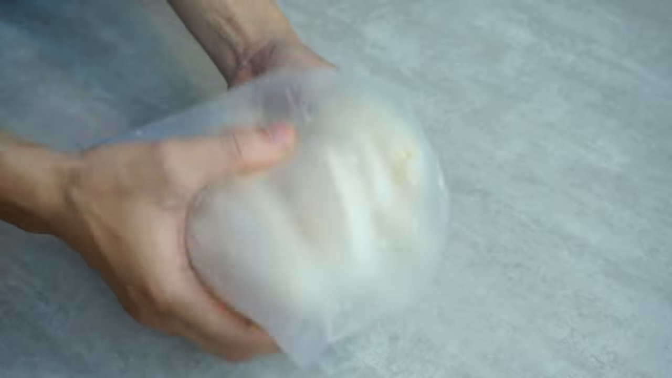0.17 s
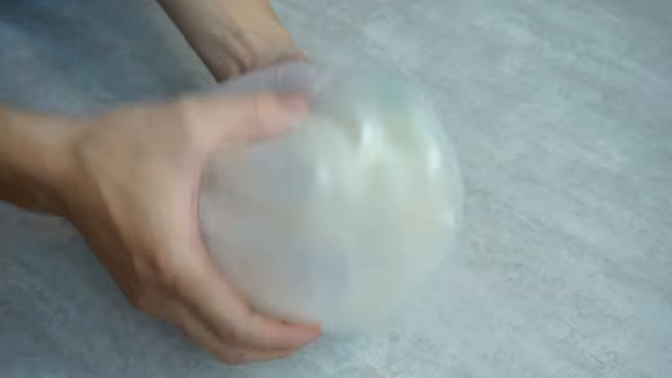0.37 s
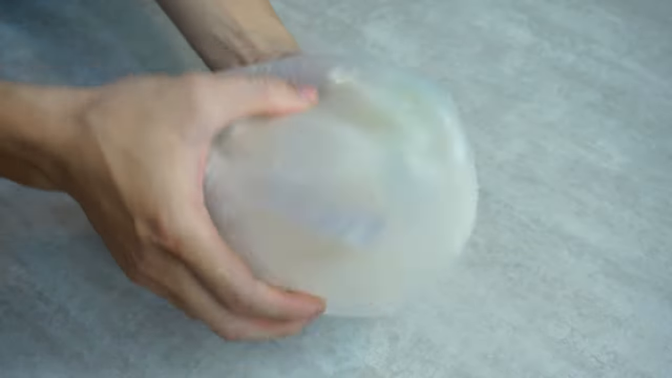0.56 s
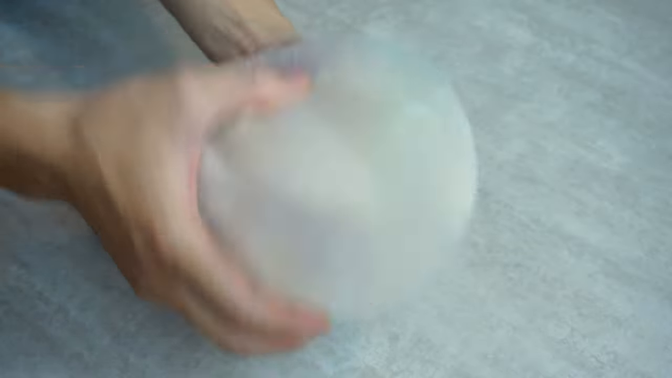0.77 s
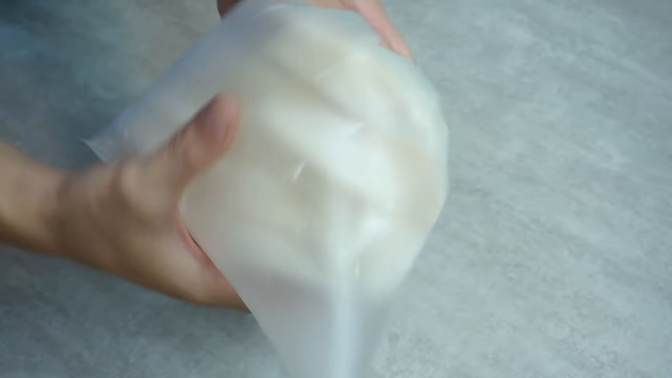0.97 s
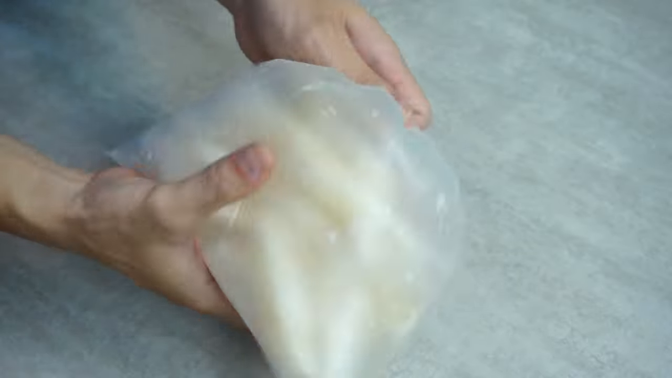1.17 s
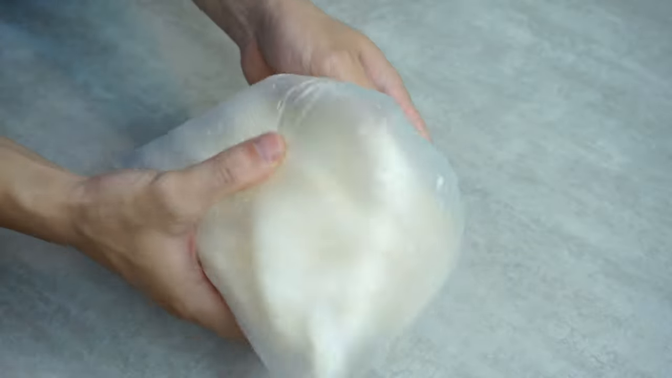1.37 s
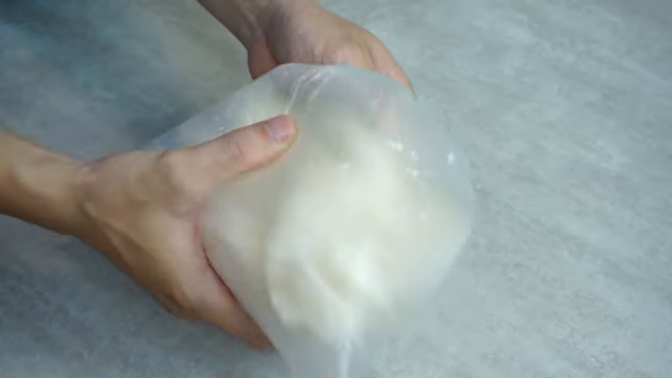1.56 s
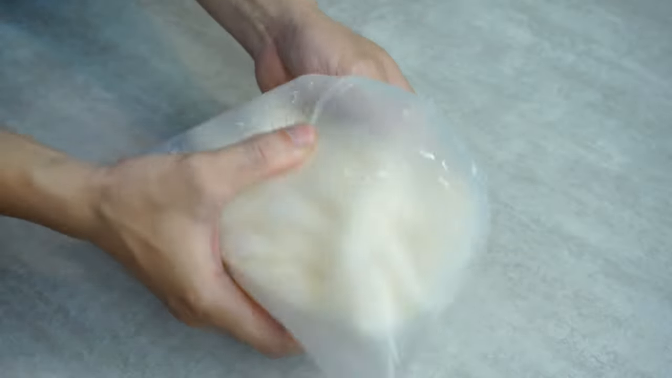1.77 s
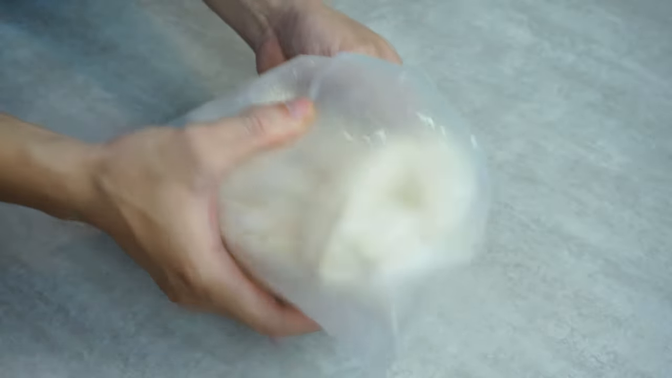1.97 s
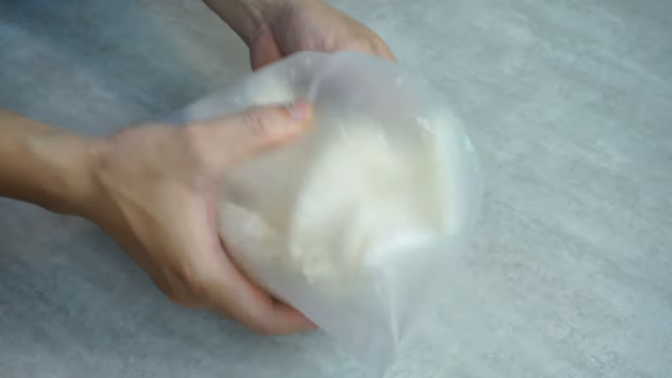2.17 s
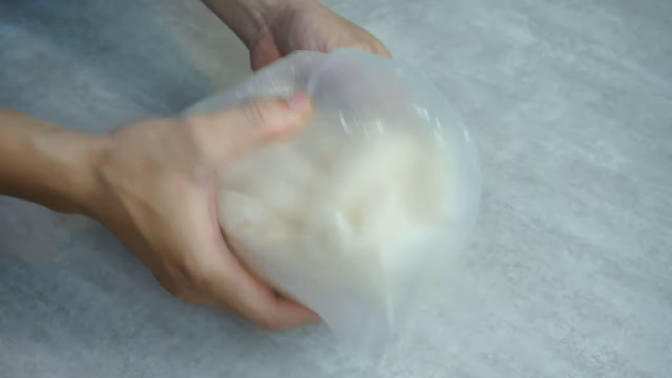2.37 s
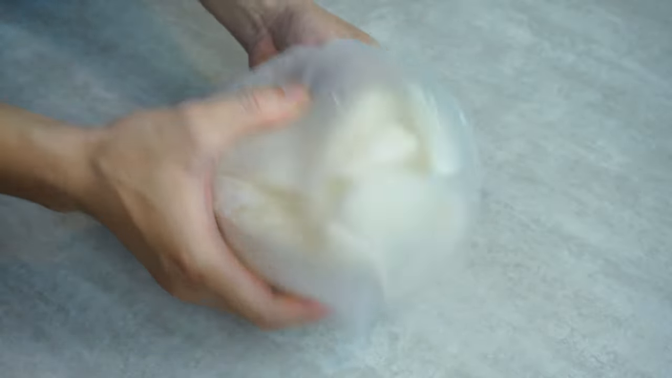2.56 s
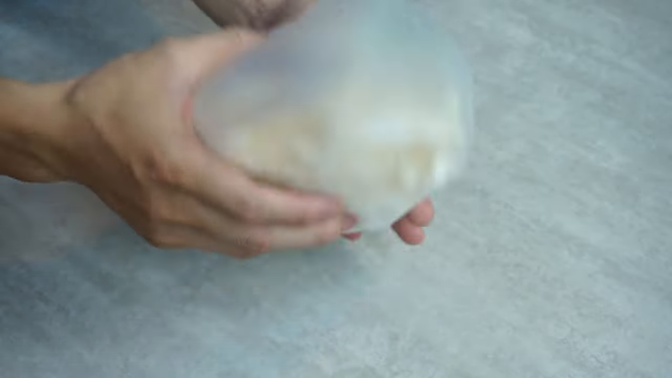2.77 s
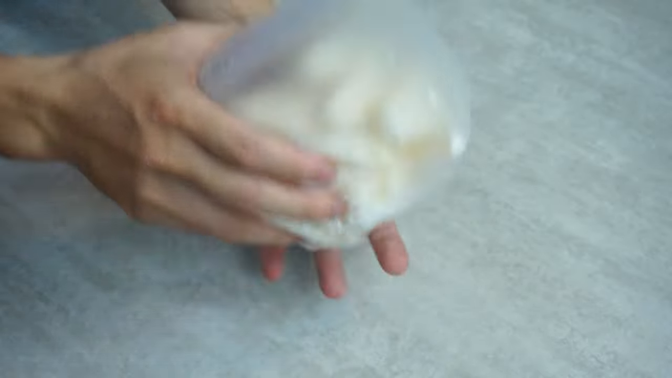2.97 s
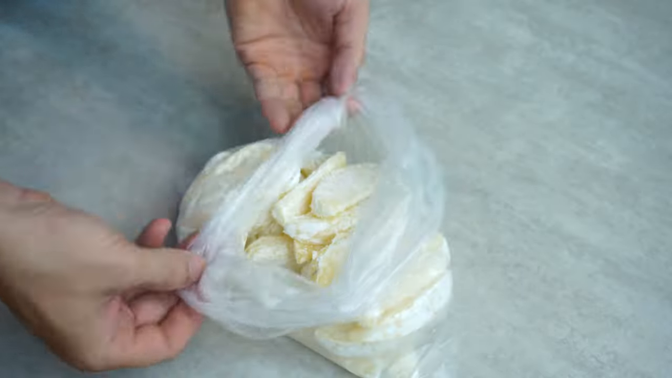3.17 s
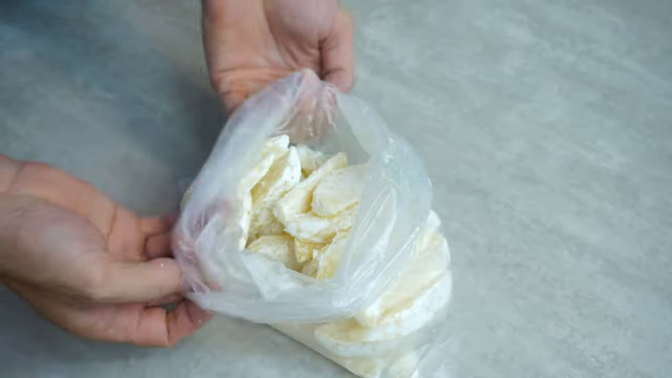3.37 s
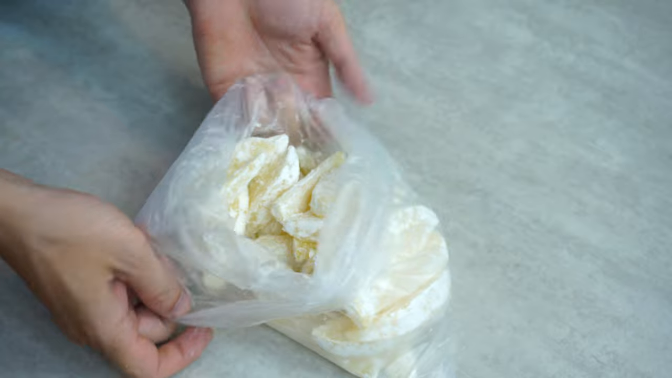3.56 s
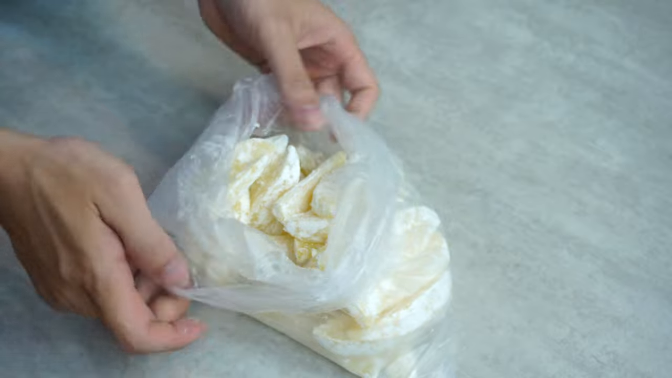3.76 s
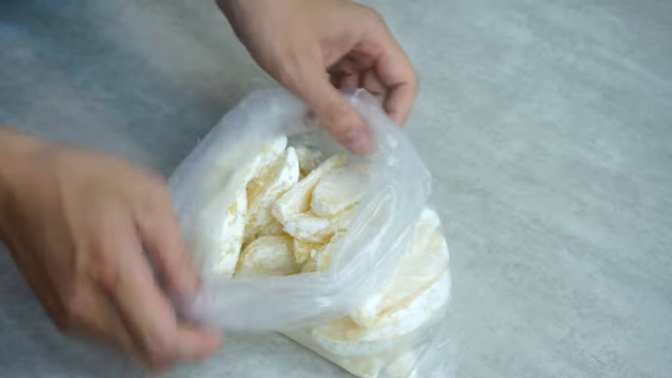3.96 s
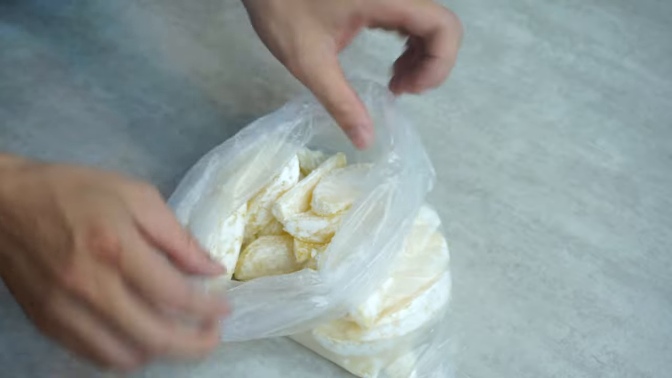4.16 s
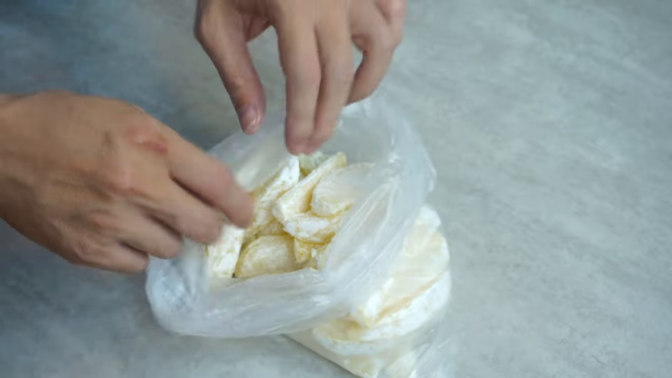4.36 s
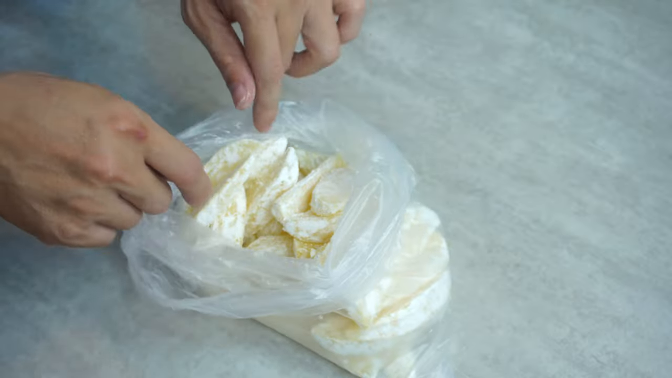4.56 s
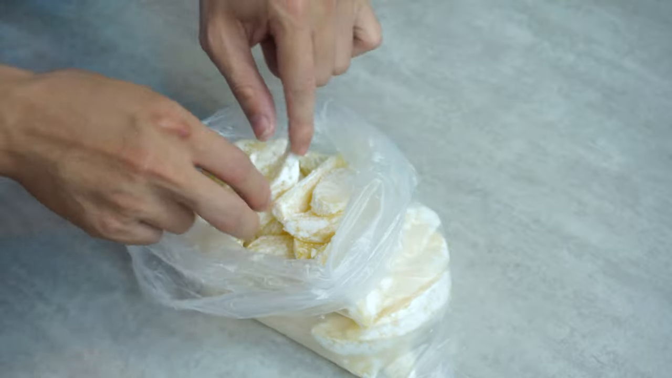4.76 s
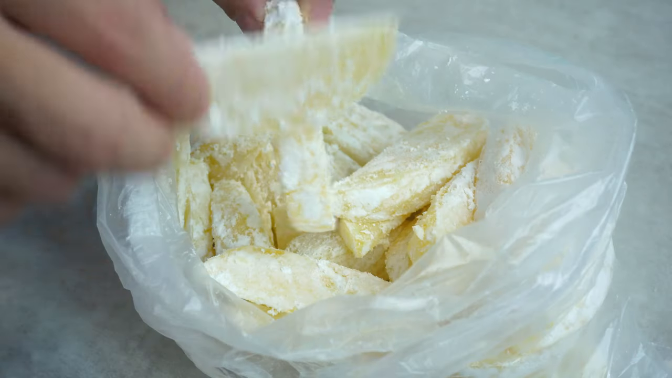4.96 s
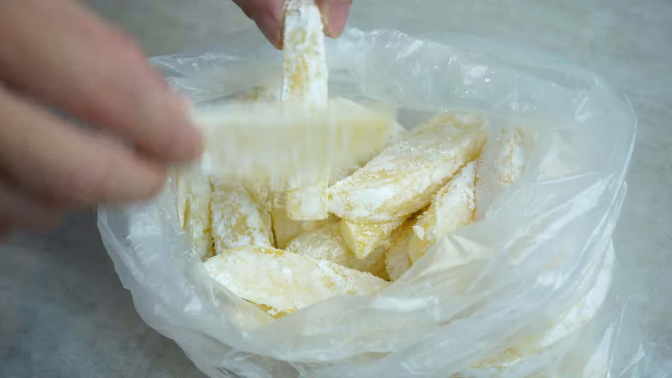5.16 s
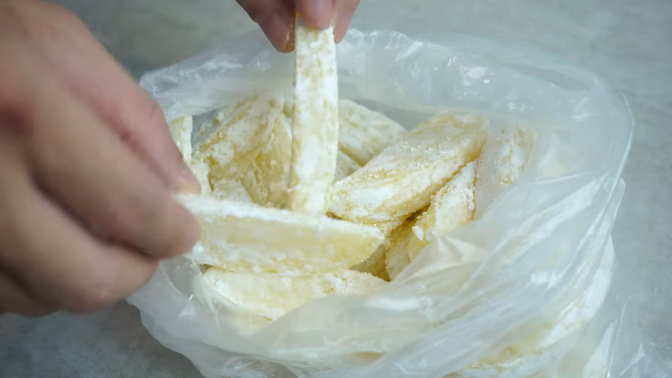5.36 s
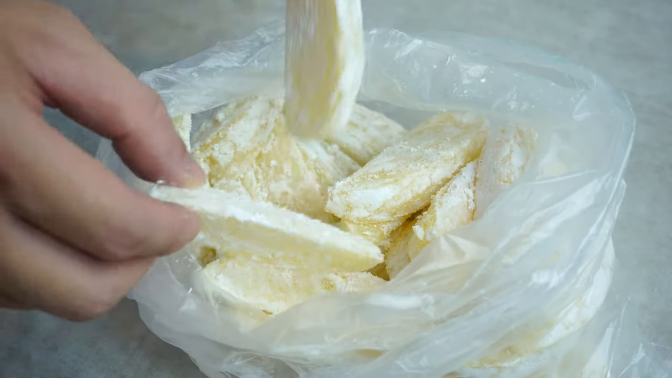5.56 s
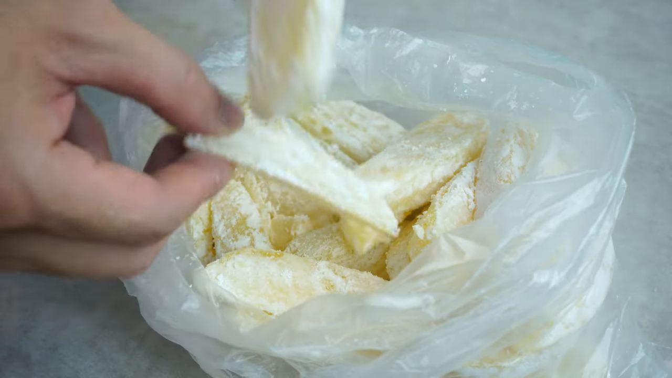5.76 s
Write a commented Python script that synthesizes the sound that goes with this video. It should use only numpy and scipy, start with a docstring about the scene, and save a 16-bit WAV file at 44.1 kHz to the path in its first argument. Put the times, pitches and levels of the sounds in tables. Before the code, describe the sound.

Potato wedges thud around in a shaken plastic bag, then the bag crinkles open and one wedge taps lightly against another.

```python
"""Two hands shake potato wedges in a thin plastic bag: the wedges collide with dull thuds, slap and
crease the film, and set the enclosed air humming. At 3.06 s a second scene starts abruptly: over a faint
kitchen rumble the hands pull the bag open, and its folds buckle with crinkles and sharp snaps.
From 5 s, heard closer, fingers rub the dry wedges and lift one out; it taps another near 5.4 s,
and the film crinkles softly to the end."""
import sys
import numpy as np
from scipy import signal
from scipy.fft import rfft, irfft, next_fast_len
from scipy.io import wavfile
from scipy.ndimage import uniform_filter1d, map_coordinates

SR = 44100
rng = np.random.default_rng(int(sys.argv[2]) if len(sys.argv) > 2 else 0)


def bounce(signal):
    """Save signal as a 16-bit WAV file at the path given by the first command-line argument."""
    frames = np.transpose(np.atleast_2d(signal))
    limited = np.clip(frames, -1, 1)
    pcm = np.round(limited * 32767).astype(np.int16)
    wavfile.write(sys.argv[1], SR, pcm)


N = 256662
TIME = np.arange(N) / SR
OPEN_S, LIFT_S = 3.058, 4.99  # shaking gives way to opening, opening to lifting
TOP_HZ = 16000


def amp(db):
    """Decibels to amplitude ratio."""
    return 10 ** (np.asarray(db) / 20)


def unit_rms(x):
    """Normalisation to unit mean power."""
    return x / np.sqrt(np.mean(x ** 2) + 1e-20)


def at_frequency(points, hz):
    """Interpolation of (frequency_hz, value) points on a logarithmic axis."""
    knots_hz, values = np.transpose(points)
    return np.interp(np.log(hz + 1), np.log(knots_hz + 1), values)


def curves(rows):
    """Linear interpolation in time: one curve for each column after the first."""
    times, *columns = np.transpose(rows)
    return [np.interp(TIME, times, column) for column in columns]


def wobble(rate_hz, size=N):
    """Slow random modulation: a spline through Gaussian knots."""
    knots = rng.standard_normal(int(size * rate_hz / SR) + 4)
    return map_coordinates(knots, [np.arange(size) * rate_hz / SR])


def filtered(x, response):
    """Linear filtering: the spectrum times a frequency response."""
    size = next_fast_len(N + 8192)
    return irfft(rfft(x, size) * response(np.fft.rfftfreq(size, 1 / SR)), size)[..., :N]


def pulses(peak_s, gain, hz, rise_s, phase, size):
    """Superposition of damped sine bursts, each with its envelope peaking at peak_s."""
    t = np.arange(size) / SR
    age = t / rise_s[:, None]
    carrier = np.sin(2 * np.pi * (hz[:, None] * t + phase[:, None]))
    bursts = gain[:, None] * age * np.exp(1 - age) * carrier
    index = np.round(np.abs(peak_s - rise_s) * SR).astype(int)[:, None] + np.arange(size)
    return np.bincount(index.ravel(), bursts.ravel(), N + size)[:N]


# Stereo width: frequency_hz, side_minus_mid_db
STEREO_WIDTH = [(60, -28.5), (110, -32), (200, -19), (380, -13), (700, -11.5), (1290, -8), (2380, -9),
                (4400, -4.5), (8120, -4), (15000, -4)]
def spread(pair, spectrum, inside):
    """Mid-side stereo: coloured sound whose channels are more coherent in the bass than the treble."""
    def response(hz):
        return amp(at_frequency(spectrum, hz) + [0 * hz, at_frequency(STEREO_WIDTH, hz)])
    mid, side = filtered(pair, response)
    return np.array([mid + side, mid - side]) / np.sqrt(np.mean(mid[inside] ** 2))


def grains(span, spectrum, top_hz, rise_s, spread_db, clump_db, clump_hz, hiss, count, size):
    """Shot noise: tiny random bursts over a hiss, amplitude-modulated into clumps."""
    when, pitch, mid_phase, side_phase, slowness = rng.random((count, 5)).T
    times = span[0] + when * (span[1] - span[0])
    gain = amp(spread_db * np.clip(rng.standard_normal(count), -3, 2.5))
    rises = rise_s * 4 ** slowness
    inside = slice(round(span[0] * SR), round(span[1] * SR))
    pair = np.zeros((2, N))
    for channel, phase in enumerate((mid_phase, side_phase)):
        bursts = pulses(times, gain, pitch * top_hz, rises, phase, size)[inside]
        pair[channel, inside] = unit_rms(bursts) + hiss * rng.standard_normal(len(bursts))
    return spread(pair * amp(clump_db * wobble(clump_hz)), spectrum, inside)


def patchy(x, depth_db, size):
    """Spectral fluctuation: small parts ring and fall silent, as narrow, brief patches of gain."""
    spectra = signal.stft(x, nperseg=size)[2]
    field = uniform_filter1d(rng.standard_normal(spectra.shape[1:]), size=2, axis=0)
    field = uniform_filter1d(field, size=6, axis=1)
    return signal.istft(spectra * amp(depth_db * unit_rms(field)), nperseg=size)[1][:, :N]


# Kitchen noise and hands shifting over the counter: frequency_hz, density_db
ROOM_SPECTRUM = [(50, -44), (80, -10), (105, -6.5), (130, -8), (160, -5), (250, -5.5), (400, -11),
                 (900, -18), (3000, -23.5), (9000, -32), (13000, -40), (15800, -54.5)]
HANDLING_SPECTRUM = [(60, -29), (100, 2), (200, 2.5), (350, -7), (480, -15), (700, -40), (1200, -120)]
# Their envelopes: time_s, level_db
ROOM_LEVELS = [(3.06, -51), (3.13, -67), (3.7, -64), (4.1, -59), (4.3, -64.5), (4.6, -59), (4.82, -65),
               (5.0, -71.5), (5.15, -72), (5.3, -74), (5.4, -67.5), (5.82, -68)]
HANDLING_LEVELS = [(5.3, -95), (5.35, -72), (5.395, -65), (5.46, -71), (5.53, -70), (5.57, -74),
                   (5.63, -64), (5.68, -68), (5.74, -76), (5.79, -64), (5.82, -71)]
# Swells of the room's lowest mode: peak_s, level_db
MODE_SWELLS = [(3.76, -77.5), (3.93, -70), (4.13, -68), (4.58, -76), (4.68, -66), (4.76, -70), (4.84, -63),
               (5.16, -66), (5.4, -62), (5.53, -61), (5.68, -66), (5.8, -70)]
def kitchen_rumble(mode_hz=53, wander=.08, floor_db=-79.5, swell_s=.05):
    """A standing wave, the room's lowest mode, swells and fades amid ambient and handling noise."""
    handling = spread(rng.standard_normal((2, N)), HANDLING_SPECTRUM, slice(N))
    room = spread(rng.standard_normal((2, N)), ROOM_SPECTRUM, slice(N))
    hz = mode_hz * (1 + wander * wobble(25))
    mode = np.sqrt(2) * np.sin(2 * np.pi * np.cumsum(hz) / SR)
    swells = sum(amp(db) * np.exp(-((TIME - peak_s) / swell_s) ** 2) for peak_s, db in MODE_SWELLS)
    handling *= amp(curves(HANDLING_LEVELS)[0] + 2.7 * wobble(35))
    room *= amp(curves(ROOM_LEVELS)[0] + 1.56 * wobble(3.03))
    return (amp(floor_db) + swells) * mode + handling + room


# Reverberation time of the kitchen: frequency_hz, t60_s
ROOM_DECAY = [(100, .3), (1000, .25), (5000, 0.13), (15000, 0.086)]
def reverberation(x, level_db=-10):
    """Convolution with a diffuse tail that decays exponentially, fastest in the treble."""
    hz, t, spectra = signal.stft(rng.standard_normal((2, SR // 2)), SR, nperseg=256)
    decay = amp(-60 * t / at_frequency(ROOM_DECAY, hz)[:, None])
    tail = signal.istft(spectra * decay, SR, nperseg=256)[1]
    delayed = np.pad(x, ((0, 0), (200, 0)))
    return amp(level_db) * signal.fftconvolve(delayed, tail / np.linalg.norm(tail[0]), axes=1)[:, :N]


# Dry wedges rubbing: peak_s, level_db, pitch_hz, half_width_s
WEDGE_RUBS = [(4.789, -58, 424, 0.028), (4.795, -61, 1000, .012), (5.347, -67.5, 2050, .01),
              (5.373, -58, 2500, .012), (5.396, -49, 2500, .015), (5.396, -46, 5400, .012),
              (5.399, -49, 6200, .008), (5.42, -59, 2600, .006), (5.43, -56, 5500, .02),
              (5.478, -64, 2250, .015), (5.522, -66, 2150, .018), (5.617, -60, 2900, .005),
              (5.7, -68, 2300, .02), (5.73, -58, 2200, .005), (5.753, -56, 2020, .008),
              (5.763, -65, 2550, .028), (5.783, -63, 2150, .006)]
def wedge_rubs(relative_bandwidth=0.11):
    """Friction excites a rough, narrow-band ring under a Gaussian envelope."""
    out, t = np.zeros(N + SR), np.arange(-SR // 10, SR // 10) / SR
    for peak_s, db, hz, half_width_s in WEDGE_RUBS:
        roughness = unit_rms(.3 + wobble(relative_bandwidth * hz, size=len(t)))
        envelope = amp(db) * np.exp(-(t / half_width_s) ** 2)
        out[round((peak_s + t[0]) * SR):][:len(t)] += envelope * roughness * np.sin(2 * np.pi * hz * t)
    return out[:N]


# One wedge tapping another: start_s, level_db
WEDGE_TAPS = [(5.384, -42.5), (5.391, -39.5), (5.396, -46), (5.403, -48), (5.419, -54)]
# Modes of a wedge: pitch_hz, level_db, t60_s
WEDGE_MODES = [(170, -5, 0.043), (875, 1, 0.018), (1480, 4.5, 0.019), (2020, 7, 0.014), (2550, 8, 0.013),
               (2900, -2, .008)]
def wedge_taps(grit=0.45, attack_s=0.0025):
    """Impact excites damped modes, at new strengths each tap; rough surfaces make them flutter."""
    out, t = np.zeros(N + SR), np.arange(SR // 10) / SR
    for start_s, db in WEDGE_TAPS:
        ring = np.zeros(len(t))
        for hz, mode_db, t60 in WEDGE_MODES:
            decay = amp(mode_db + rng.normal(0, 2.4) - 60 * t / t60)
            flutter = unit_rms(uniform_filter1d(rng.standard_normal(len(t)), size=120))
            ring += decay * unit_rms(1 + grit * flutter) * np.sin(2 * np.pi * (hz * t + rng.random()))
        out[round(start_s * SR):][:len(t)] += amp(db) * ring * (1 - np.exp(-t / attack_s))
    return out[:N]


def lingering(gain, decay_s):
    """Exponential energy decay of an envelope; nothing carries over from opening to lifting."""
    keep = np.exp(-1 / (decay_s * SR))
    return sum(part * np.sqrt(np.abs(signal.lfilter([1 - keep], [1, -keep], (part * gain) ** 2)))
               for part in (TIME < LIFT_S, TIME >= LIFT_S))


# Creasing while the bag is opened, then while a wedge is lifted: time_s, level_db
OPEN_LEVELS = [(3.062, -28.5), (3.24, -26.5), (3.28, -26), (3.346, -30), (3.378, -25.5), (3.554, -27),
               (3.57, -23), (3.748, -37), (3.785, -39.5), (3.797, -37), (3.835, -38.5), (3.86, -43),
               (3.898, -45), (3.968, -25.5), (4.054, -23), (4.102, -30.5), (4.16, -32.5), (4.332, -67.5),
               (4.385, -56), (4.395, -48), (4.415, -34.5), (4.44, -29), (4.514, -26), (4.596, -36.5),
               (4.682, -41), (4.74, -56), (4.8, -55.5), (4.86, -57.5), (4.9, -60.5), (4.988, -60)]
LIFT_LEVELS = [(4.994, -78), (5.06, -78), (5.15, -90), (5.315, -82), (5.34, -60), (5.378, -48),
               (5.392, -35), (5.44, -55), (5.47, -52.5), (5.5, -54), (5.572, -70), (5.614, -58),
               (5.67, -63), (5.72, -55.5), (5.76, -52), (5.8, -56), (5.82, -61)]
# Lower bands of the slack bag, relative to the creasing: time_s, rustle_db, body_db
SLACK_LEVELS = [(3.06, -13, -17.5), (3.3, -14, -17.5), (3.6, -14.5, -18.5), (3.9, -9.5, -14.5),
                (4.05, -12.5, -15), (4.2, -10.5, -12.5), (4.45, -8.5, -16.5), (4.52, -15, -17.5),
                (4.62, -10.5, -13), (4.75, -13.5, -13), (4.98, -8, -17.5), (5.3, -18, -14.5),
                (5.36, -4.5, -16), (5.41, -15, -27), (5.45, -15, -20), (5.52, -10, -23), (5.6, -10, -23),
                (5.68, -9, -17), (5.75, -14, -25), (5.8, -16, -25)]
# The film's fizz, rustle near 2 kHz and dull body, and the sagging load: frequency_hz, density_db
FIZZ_SPECTRUM = [(400, -53.5), (2650, -12.5), (4500, -8), (5820, -5), (9500, -2.5), (14900, -4.5),
                 (15800, -5)]
CLOSE_FIZZ_SPECTRUM = [(1500, -34.5), (3800, -22.5), (5500, -11), (7500, -10), (10000, -5.5), (12500, -4),
                       (15800, -5)]
RUSTLE_SPECTRUM = [(900, -37), (1400, -5), (1800, -1), (2250, 3), (2650, -7), (3000, -7.5), (5000, -8.5),
                   (7000, -26.5), (9900, -120)]
CLOSE_RUSTLE_SPECTRUM = [(900, -30), (1500, -12), (1900, -8.5), (2200, -3.5), (2600, -12), (3000, -11.5),
                         (4500, -15), (7000, -15), (9900, -120)]
BODY_SPECTRUM = [(120, -49), (300, -18), (500, -7.5), (700, -6.5), (950, -4), (1400, -8.5), (1800, -35),
                 (3000, -120)]
SAG_SPECTRUM = [(120, -49), (230, -15.5), (300, -5), (340, 0), (390, -3), (600, -5), (900, -25),
                (1500, -120)]
# Position of the hands: time_s, left_minus_right_db
HAND_BALANCE = [(3.06, 0.5), (4.9, 1), (5.5, 2.5), (5.82, 3)]
def bag_opening(sag_db=-9.5):
    """Film buckling under the fingers radiates crackle; the lower bands linger after they stop."""
    opening, lifting, both = (OPEN_S, LIFT_S), (LIFT_S, N / SR), (OPEN_S, N / SR)
    crease = amp(curves(OPEN_LEVELS + LIFT_LEVELS)[0]) * (TIME >= OPEN_S)
    rustle_db, body_db = curves(SLACK_LEVELS)
    fizz = grains(opening, FIZZ_SPECTRUM, top_hz=17400, rise_s=.0001, spread_db=5.1,
                  clump_db=.42, clump_hz=65, hiss=3.1, count=9000, size=120)
    fizz += grains(lifting, CLOSE_FIZZ_SPECTRUM, top_hz=16700, rise_s=.00012, spread_db=4.2,
                   clump_db=1.1, clump_hz=90, hiss=1.37, count=1500, size=120)
    rustle = grains(opening, RUSTLE_SPECTRUM, top_hz=6880, rise_s=.000386, spread_db=2.1,
                    clump_db=.69, clump_hz=50, hiss=4.8, count=2500, size=400)
    rustle += grains(lifting, CLOSE_RUSTLE_SPECTRUM, top_hz=7220, rise_s=.000493, spread_db=3.6,
                     clump_db=.79, clump_hz=40, hiss=3.1, count=800, size=500)
    body = grains(both, BODY_SPECTRUM, top_hz=2184, rise_s=.000734, spread_db=1,
                  clump_db=1, clump_hz=30, hiss=4.3, count=1200, size=500)
    sag = grains(both, SAG_SPECTRUM, top_hz=910, rise_s=.001, spread_db=1.1,
                 clump_db=.5, clump_hz=44, hiss=3.8, count=600, size=700)
    rustle *= amp(rustle_db) * lingering(crease, decay_s=.018)
    body *= amp(body_db) * lingering(crease, decay_s=.025)
    sag *= amp(body_db + sag_db) * lingering(crease, decay_s=.054)
    crinkle = patchy(crease * fizz + rustle, depth_db=2, size=512)
    pan_db = curves(HAND_BALANCE)[0]
    return (crinkle + body + sag) * amp([pan_db / 2, -pan_db / 2])


# Single folds flipping over: time_s, level_db, pitch_hz, left_minus_right_db
FOLD_SNAPS = [(0.074, -11, 5050, 0.0), (0.26, -13, 2400, 1.0), (0.2932, -1.5, 6610, 3),
              (0.415, -4, 3000, -2), (0.5137, -7, 5130, 0.5), (0.556, 0, 2180, -2), (0.767, -6, 4960, 2),
              (0.858, -12, 2300, 0), (0.8873, -4, 5910, 3), (0.9034, -7.5, 6280, 2), (1.104, -1, 3660, -1),
              (1.255, -3, 3940, 3), (1.3444, -7, 5040, 2), (1.772, -5, 5000, 2), (2.161, -7, 4020, 0.5),
              (2.2447, -5, 3680, 0.0), (2.2587, -6, 3700, -0.5), (2.4894, -5, 3500, -9),
              (2.5634, -9, 6440, -0.5), (2.8944, -4.5, 6610, 3), (2.9468, -5, 3880, 0.0),
              (3.3758, -10, 11000, 3), (3.6188, -14, 11000, 2), (3.6594, -12, 11000, 2),
              (3.7925, -14, 13000, 5), (3.8393, -16, 11000, 2), (3.9685, -17, 10000, -1),
              (4.0618, -7, 10000, 1), (4.205, -19, 8000, 6), (4.393, -30, 12000, 3), (4.411, -14, 13100, 2),
              (4.4318, -15, 11500, -4), (4.525, -5, 12300, 0.5), (4.534, -12, 12300, 0),
              (4.5455, -5, 12000, 1), (4.5514, -9, 11900, -2.5), (4.643, -15, 12000, 0),
              (4.6534, -15, 12800, 4), (4.7785, -32, 14000, 5), (4.7945, -27, 14500, 7),
              (4.8054, -28, 13100, 4), (4.832, -33, 12100, 9), (4.8555, -33, 11000, 14),
              (4.8625, -20.5, 12000, 5), (4.915, -39, 12000, 2), (4.9866, -43.5, 9560, -3),
              (5.053, -50, 9830, 1), (5.3857, -29, 12960, 1), (5.3914, -19, 12300, 2),
              (5.3964, -17, 12300, 2), (5.4175, -23, 12700, 2), (5.4225, -25, 12000, -1),
              (5.4808, -37, 13100, 0), (5.4995, -34, 13000, 2), (5.6083, -41, 9450, 8),
              (5.6245, -40, 10100, 9), (5.6427, -34, 11100, 7), (5.7158, -36, 11440, 8),
              (5.727, -31, 11800, 13), (5.739, -29.5, 12200, 5), (5.7485, -32, 12100, 10),
              (5.7543, -24, 12400, 14), (5.783, -29, 12000, 9), (5.7907, -34, 12700, 6),
              (5.7966, -35, 10500, 6), (5.8103, -36, 12500, 3)]
def fold_snaps(highpass_hz=897):
    """Snap-through buckling in four slips: a sharp click, then weaker ones that ring a little longer."""
    times, db, hz, pan_db = np.repeat(FOLD_SNAPS, repeats=4, axis=0).T
    slip = np.arange(len(times)) % 4
    lag, detune, phase = rng.random((len(times), 3)).T
    times = times + .0009 * slip * lag
    hz = np.minimum(hz * (1 + .15 * slip * (detune - .5)), TOP_HZ - 800)
    rise_s = .00007 * (1 + .61 * slip)
    db = db - 9 - 3 * slip
    clicks = [pulses(times, amp(db + side * pan_db / 2), hz, rise_s, phase, 256) for side in (1, -1)]
    return filtered(np.array(clicks), lambda f: 1j * f / (highpass_hz + 1j * f))


# Hums after heavy landings: start_s, level_db, first_pitch_hz, settled_pitch_hz, t60_s
AIR_HUMS = [(.04, -25.5, 194, 184, 0.28), (.26, -25, 256, 249, 0.23), (.47, -24, 320, 321, .3),
            (.5, -28.5, 192, 189, 0.3), (0.913, -26.5, 201, 190, .1), (.921, -21.5, 373.4, 556, .18),
            (1.32, -30, 450, 568, 0.27), (1.65, -30.5, 113, 103.4, .9), (1.745, -23.5, 311, 326, 0.16),
            (1.745, -24.5, 388, 373, 0.53), (1.901, -32, 112, 105.5, .7), (1.925, -26, 300, 400, .3),
            (2.13, -26.5, 200, 184, 0.46), (2.312, -27, 437, 425, 0.26), (2.685, -23.5, 270, 135, 0.41),
            (2.69, -28, 507, 508, 0.35), (2.7, -31, 358, 428, 0.27), (2.77, -28.5, 430, 423, 0.23),
            (2.86, -29, 410, 320, .25), (2.99, -32, 478, 474, 0.15)]
def air_hums(glide_s=.05, wander=.03, attack_s=.0095, hold_s=.02):
    """Cavity resonance: the trapped air's pitch glides and wavers as the bag changes shape."""
    out, t = np.zeros(N + SR), np.arange(SR // 3) / SR
    for start_s, db, first_hz, settled_hz, t60 in AIR_HUMS:
        hz = settled_hz + (first_hz - settled_hz) * np.exp(-t / glide_s)
        hz *= 1 + wander * wobble(30, size=len(t))
        flutter_db = .6 * wobble(45, size=len(t))
        fade_db = -60 * np.maximum(t - hold_s, 0) / t60
        envelope = amp(db + flutter_db + fade_db) * (1 - np.exp(-t / attack_s))
        out[round(start_s * SR):][:len(t)] += envelope * np.sin(2 * np.pi * np.cumsum(hz) / SR)
    return out[:N]


# Low modes of the air in bag and kitchen: centre_hz, bandwidth_hz, gain_db
AIR_MODES = [(51, 7.6, 8.5), (107, 5.6, 1), (180, 16, 5), (252.6, 7.4, 4), (305.3, 6.3, 8), (396, 2, 9),
             (457, 14, 1), (496, 5.1, -6), (768.4, 6.9, 8)]
def air_resonance(x):
    """Second-order resonances each raise or lower a narrow band."""
    def response(f):
        return 1 + sum((amp(db) - 1) * 1j * f * width / (centre ** 2 - f ** 2 + 1j * f * width)
                       for centre, width, db in AIR_MODES)
    return filtered(x, response)


# Wedges slapping the film: frequency_hz, density_db
SLAP_SPECTRUM = [(25, -13.5), (710, -2.5), (1200, -7), (1690, -4.5), (2200, -2), (2620, -5.5), (6000, -12),
                 (7800, -17.5), (13200, -120)]
# Strain on the shaken film: time_s, slap_db, crinkle_db
FILM_STRAIN = [(0.0, -29, -29.5), (0.06, -26.5, -30.5), (0.45, -28.5, -31.5), (0.49, -25.5, -31.5),
               (0.66, -27.5, -31), (0.67, -25.5, -29), (0.74, -31, -36), (0.81, -29, -28.5),
               (0.85, -31, -33.5), (0.91, -30.5, -34.5), (0.93, -30.5, -35.5), (1.01, -30.5, -33.5),
               (1.09, -27.5, -30.5), (1.24, -25.5, -29), (1.47, -32.5, -37.5), (1.51, -28.5, -31),
               (1.58, -34, -37.5), (1.74, -26, -32), (1.84, -29, -36.5), (2.01, -29, -32),
               (2.03, -31.5, -35.5), (2.12, -30, -31.5), (2.22, -30.5, -34.5), (2.86, -31.5, -32.5),
               (2.95, -25.5, -29), (3.04, -34.5, -34)]
# The heap thrown against the film: start_s, level_db
HEAP_THROWS = [(.021, -28), (.1, -28.5), (.239, -26.5), (.295, -35), (.41, -31), (0.473, -25.5),
               (.509, -33.5), (.55, -34.5), (.855, -33), (.889, -26.5), (1.106, -34.5), (1.26, -34.5),
               (1.65, -29), (1.716, -28), (2.122, -26.5), (2.198, -29), (2.308, -29.5), (2.388, -35.5),
               (2.484, -35), (2.65, -30)]
def film_slaps(surge_s=.0094):
    """Impacts on a taut membrane: wedges slap and crease the film, each throw adding a surge."""
    slap = grains((0, OPEN_S), SLAP_SPECTRUM, top_hz=7960, rise_s=.0002, spread_db=2.5,
                  clump_db=.33, clump_hz=60, hiss=2.34, count=6000, size=240)
    crinkle = grains((0, OPEN_S), FIZZ_SPECTRUM, top_hz=17150, rise_s=.00012, spread_db=2,
                     clump_db=.87, clump_hz=70, hiss=1.4, count=12000, size=120)
    surge, age = np.zeros(N + SR), np.arange(SR // 10) / SR / surge_s
    for start_s, db in HEAP_THROWS:
        surge[round(start_s * SR):][:len(age)] += amp(db) * age * np.exp(1 - age)
    slap_db, crinkle_db = curves(FILM_STRAIN)
    slap *= np.hypot(amp(slap_db), surge[:N])
    crinkle *= np.hypot(amp(crinkle_db), .67 * surge[:N])
    return patchy(slap + crinkle, depth_db=2, size=512)


# Single wedges landing: peak_s, level_db, pitch_hz
WEDGE_LANDINGS = [(0.074, -18, 445), (0.258, -16, 600), (0.261, -18, 850), (0.264, -11.5, 750),
                  (0.279, -16, 700), (0.307, -14.5, 800), (0.303, -19, 556), (0.414, -16, 376),
                  (0.483, -16, 320), (0.685, -17, 328), (0.769, -20.5, 500), (0.858, -14.5, 740),
                  (0.896, -15, 700), (0.918, -9.5, 480), (1.079, -19.5, 799), (1.185, -14, 877),
                  (1.321, -12, 630), (1.462, -19.5, 503), (1.543, -18, 830), (1.652, -19, 452),
                  (1.753, -15, 310), (1.774, -18, 446), (1.947, -12, 850), (2.108, -9, 690),
                  (2.314, -17.5, 556), (2.32, -13, 850), (2.483, -20.5, 400), (2.487, -17, 900),
                  (2.4903, -13, 1300), (2.493, -15, 1100), (2.513, -14.5, 520), (2.588, -20, 382),
                  (2.714, -31, 500), (2.729, -14, 496), (2.773, -12.5, 750), (2.886, -19.5, 326),
                  (2.988, -27, 438)]
def wedge_thuds():
    """A soft contact is heavily damped: each landing lasts about one cycle."""
    peak_s, db, hz = np.transpose(WEDGE_LANDINGS)
    return pulses(peak_s, amp(db), hz, rise_s=.36 / hz, phase=np.full(len(hz), .5), size=700)


# Wedges bumping each other: frequency_hz, density_db
TUMBLE_SPECTRUM = [(26, -43), (45, -7.5), (70, -10.5), (102, 7), (190, 2.5), (309, 1), (349, 1), (376, 6.5),
                   (405, -0.5), (443, 6.5), (530, 3), (1600, -5.5), (2080, -30.5), (3520, -120)]
# Tossed wedges falling in a heap: time_s, level_db
HEAP_TOSSES = [(.04, -26.5), (.1, -31), (.17, -26.5), (.25, -24.5), (.34, -26), (.46, -27.5), (.55, -27),
               (.66, -34.5), (0.914, -24), (1.315, -24.5), (1.65, -33.5), (1.745, -30), (1.84, -28.5),
               (1.92, -28.5), (2.105, -24.5), (2.2, -27.5), (2.31, -29), (2.5, -27.5), (2.697, -29),
               (2.99, -32.5)]
def wedge_tumble(rise_s=.012, settle_s=.066, roll_db=-34.5):
    """Incoherent collisions add in power: each toss builds fast and settles over a steady roll."""
    bumps = grains((0, OPEN_S), TUMBLE_SPECTRUM, top_hz=2510, rise_s=.0005, spread_db=4.5,
                   clump_db=.19, clump_hz=30, hiss=4.44, count=2500, size=360)
    power, t = np.full(N + SR, amp(2 * roll_db)), np.arange(SR // 2) / SR
    toss = (1 - np.exp(-(t / rise_s) ** 2)) * np.exp(-t / settle_s)
    for time_s, db in HEAP_TOSSES:
        power[round(max(time_s - rise_s, 0) * SR):][:len(t)] += amp(2 * db) * toss
    return np.sqrt(power[:N]) * patchy(bumps, depth_db=1.5, size=2048)


def scene(crossfade_s=.0022):
    """Superposition: shaking gives way to opening; only snaps, taps and rubs reverberate."""
    contacts = fold_snaps() + wedge_taps() + wedge_rubs()
    shaking = air_resonance(wedge_tumble() + wedge_thuds()) + air_hums() + film_slaps()
    opening = bag_opening() + kitchen_rumble()
    blend = np.clip((TIME - OPEN_S) / crossfade_s, 0, 1)
    return (1 - blend) * shaking + blend * opening + contacts + reverberation(contacts)


def record(dry):
    """Band limiting: the microphone loses the deepest bass, and nothing passes above TOP_HZ."""
    bass_hz, edge_hz = 44.7, 120
    def response(hz):
        lowpass = np.sin(np.pi / 2 * np.clip((TOP_HZ - hz) / edge_hz, 0, 1)) ** 2
        return lowpass / np.sqrt(1 + (bass_hz / (hz + 1)) ** 6)
    return filtered(dry, response)


dry = scene()
out = record(dry)
bounce(out)
```